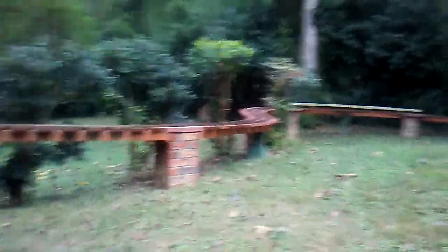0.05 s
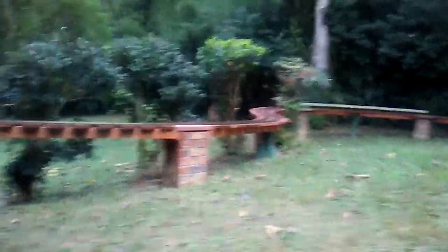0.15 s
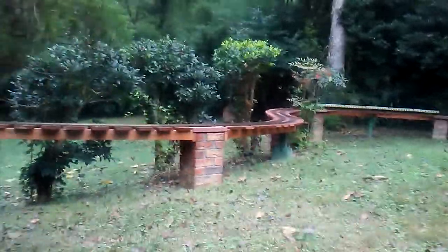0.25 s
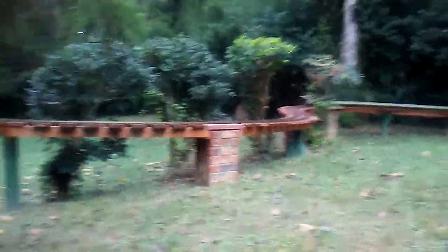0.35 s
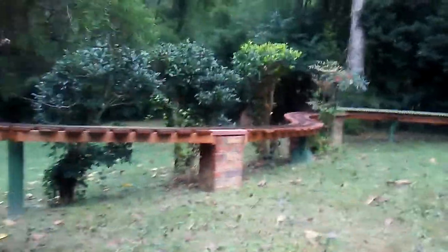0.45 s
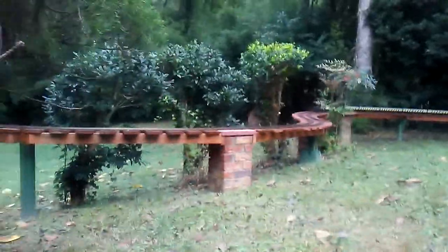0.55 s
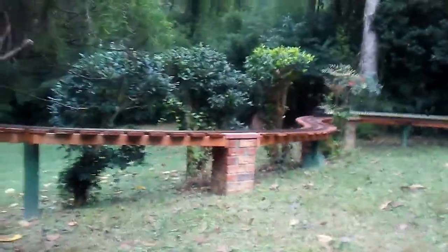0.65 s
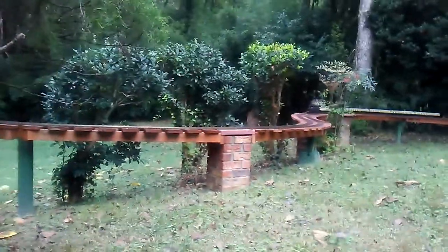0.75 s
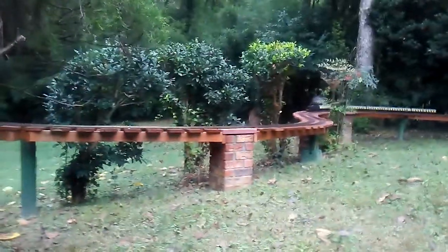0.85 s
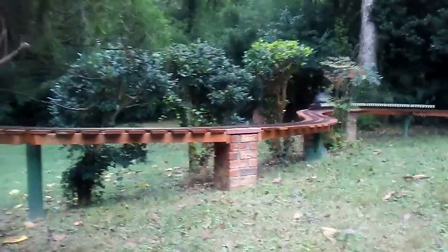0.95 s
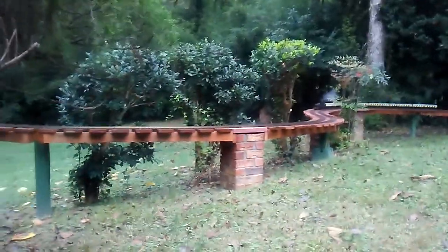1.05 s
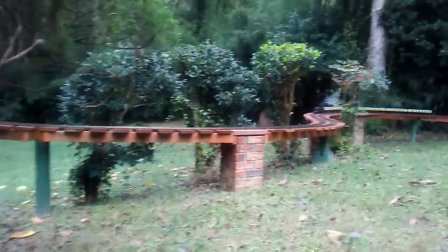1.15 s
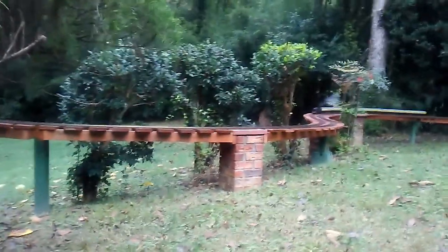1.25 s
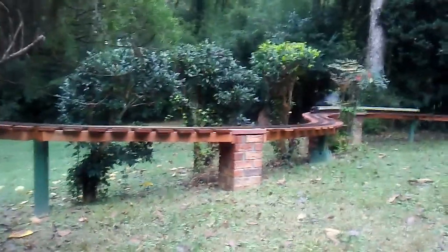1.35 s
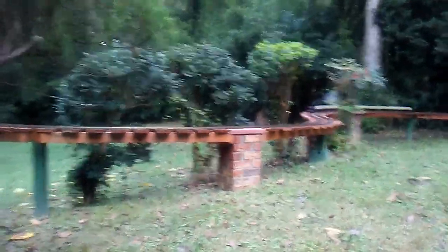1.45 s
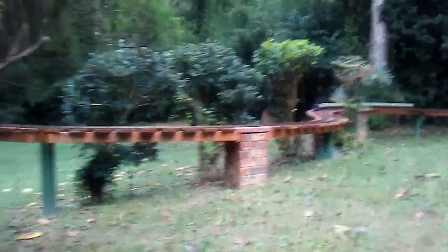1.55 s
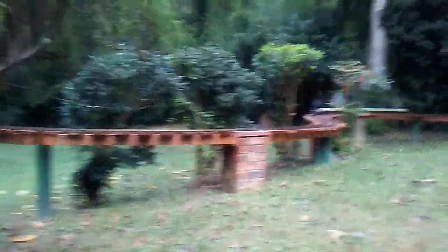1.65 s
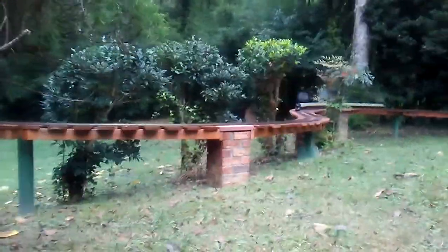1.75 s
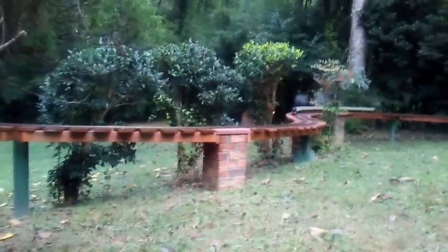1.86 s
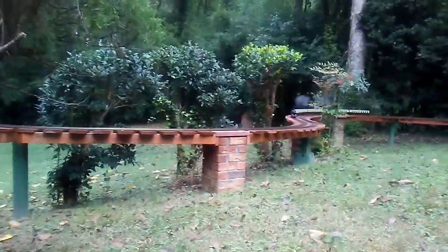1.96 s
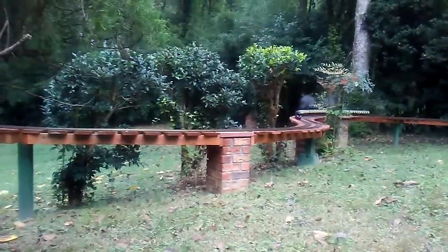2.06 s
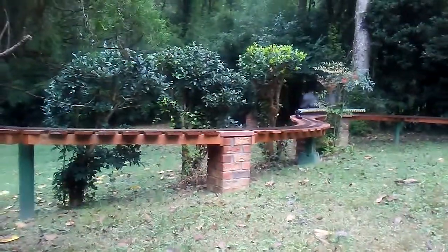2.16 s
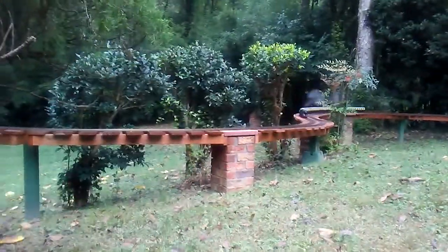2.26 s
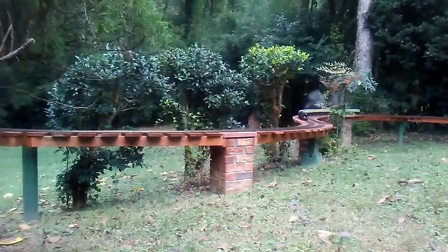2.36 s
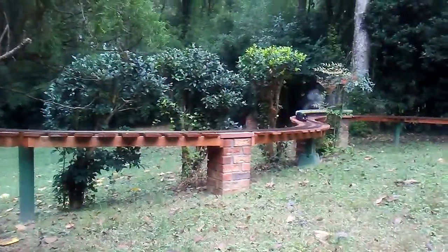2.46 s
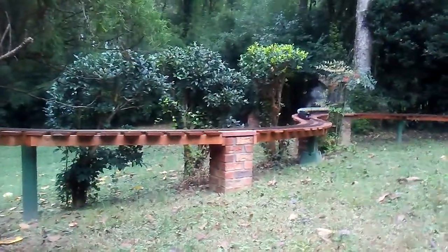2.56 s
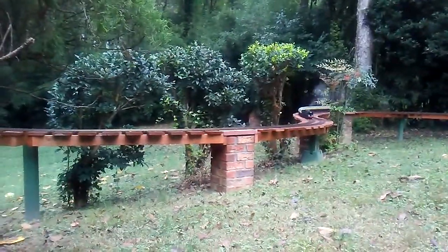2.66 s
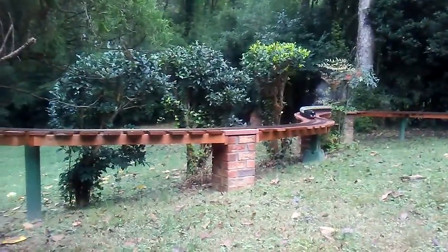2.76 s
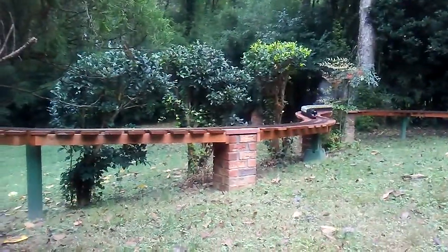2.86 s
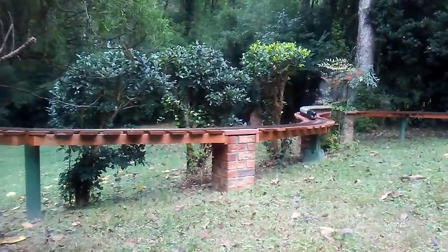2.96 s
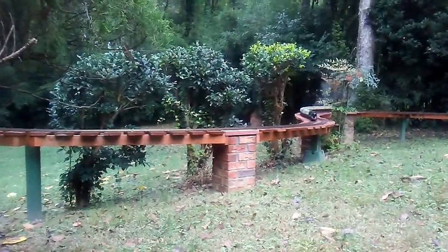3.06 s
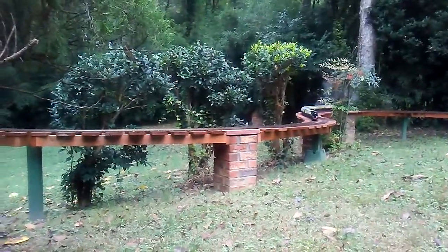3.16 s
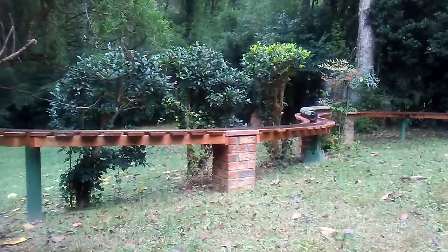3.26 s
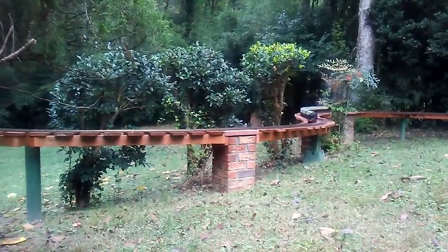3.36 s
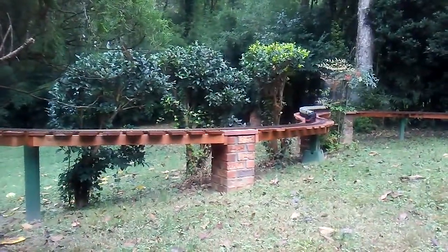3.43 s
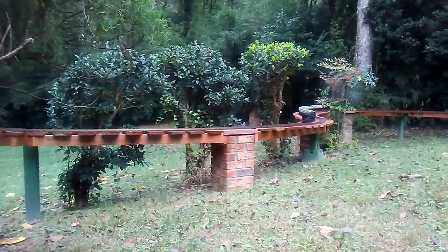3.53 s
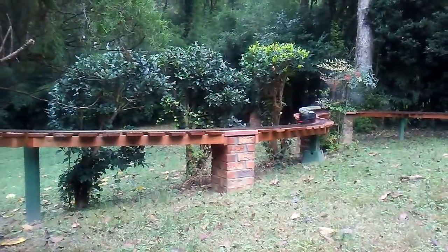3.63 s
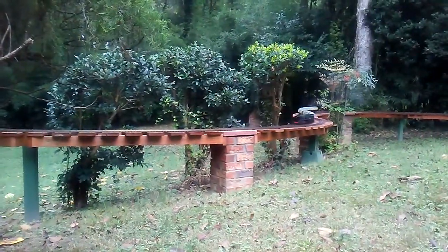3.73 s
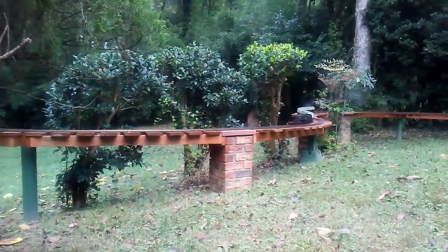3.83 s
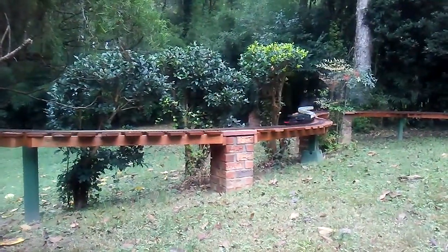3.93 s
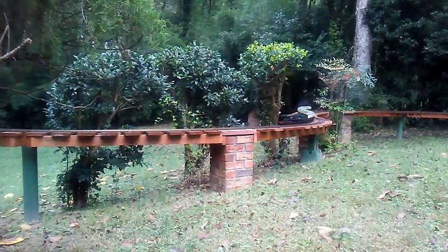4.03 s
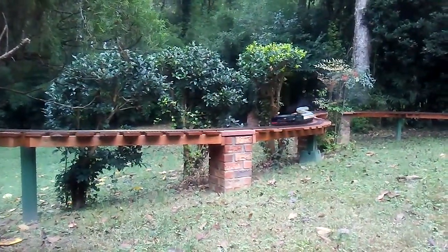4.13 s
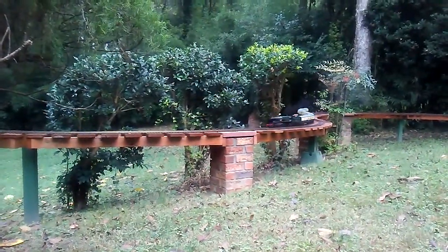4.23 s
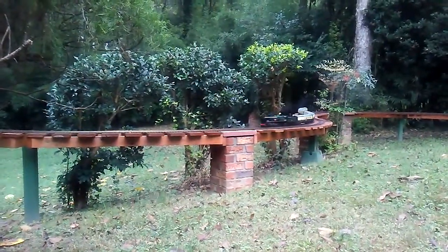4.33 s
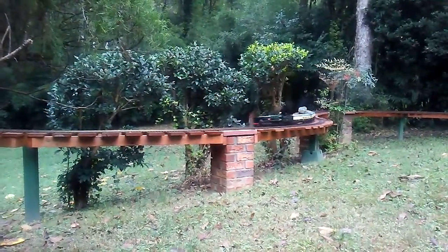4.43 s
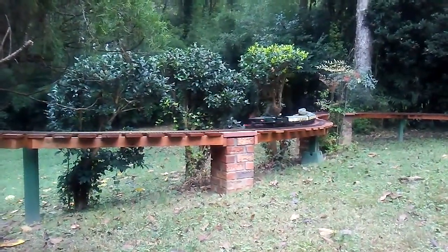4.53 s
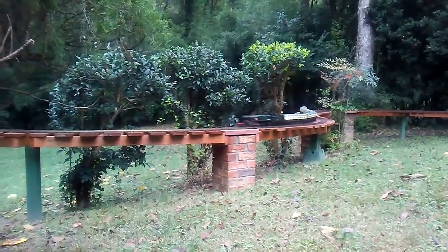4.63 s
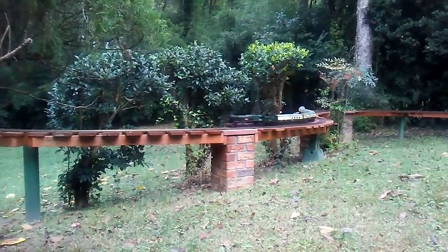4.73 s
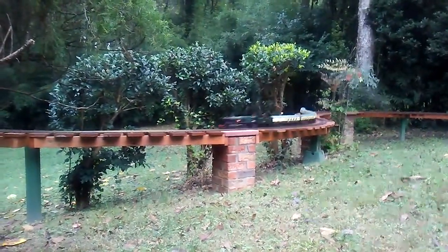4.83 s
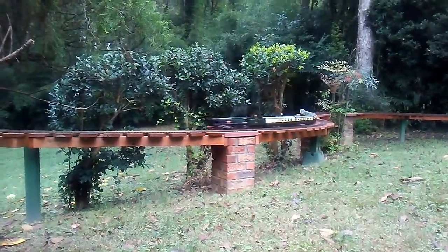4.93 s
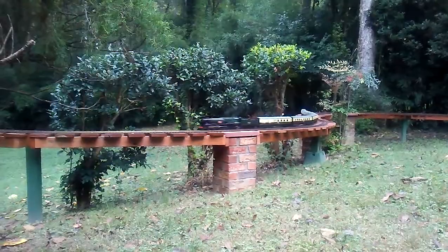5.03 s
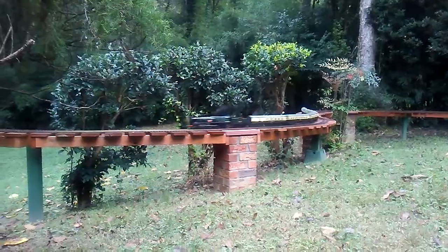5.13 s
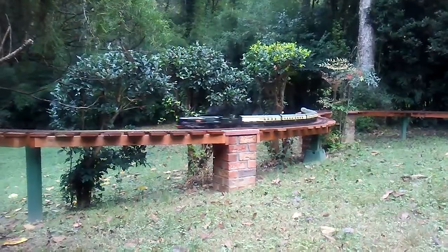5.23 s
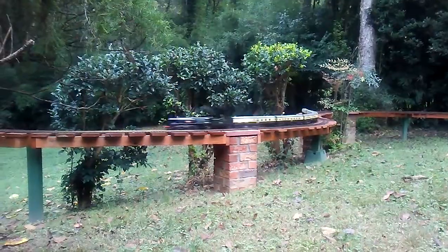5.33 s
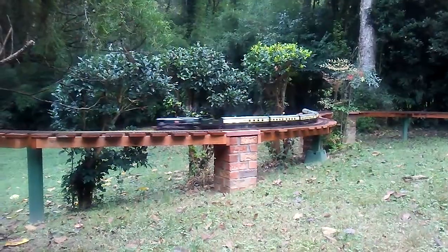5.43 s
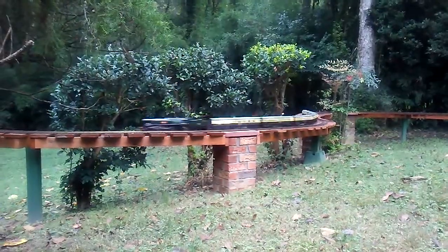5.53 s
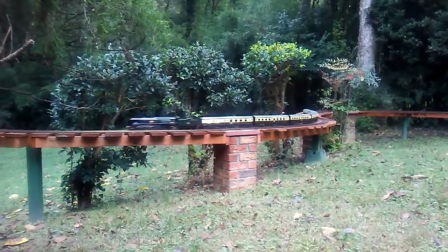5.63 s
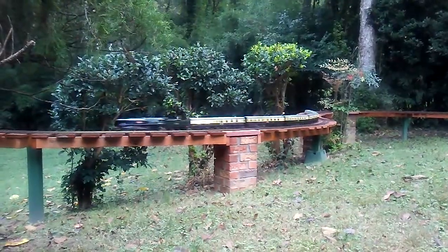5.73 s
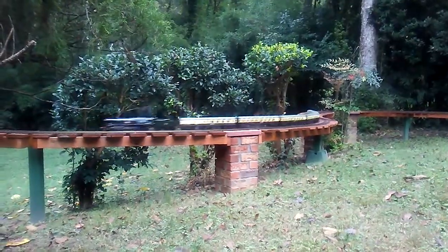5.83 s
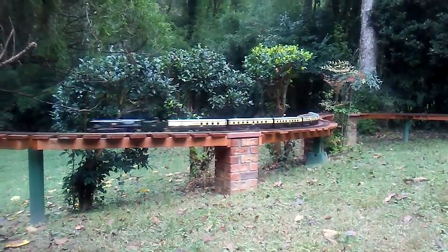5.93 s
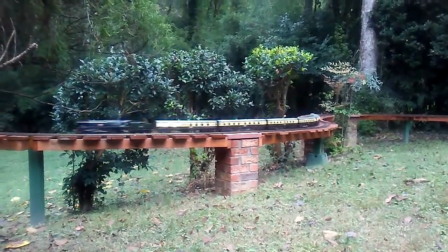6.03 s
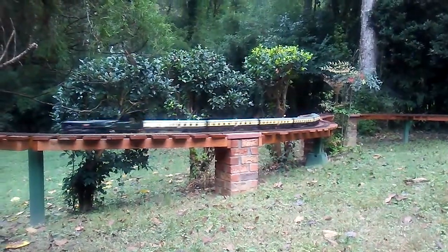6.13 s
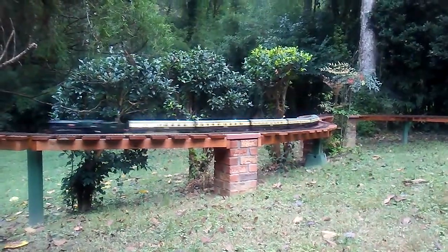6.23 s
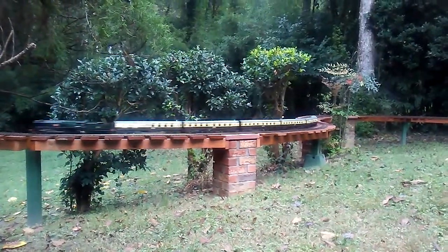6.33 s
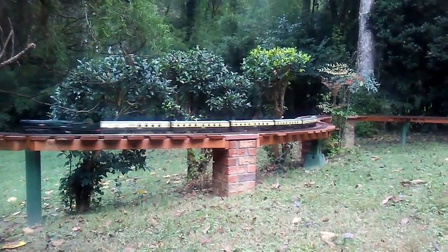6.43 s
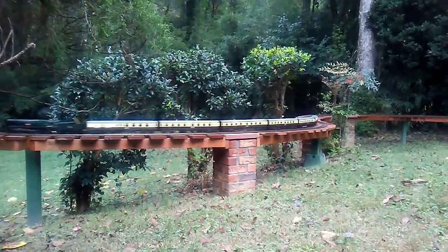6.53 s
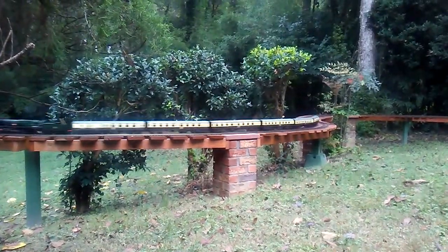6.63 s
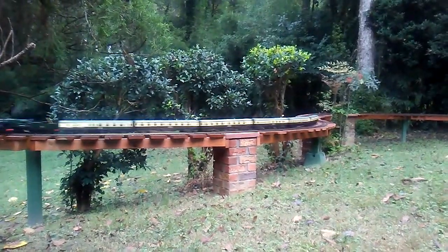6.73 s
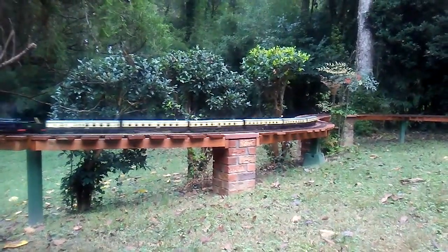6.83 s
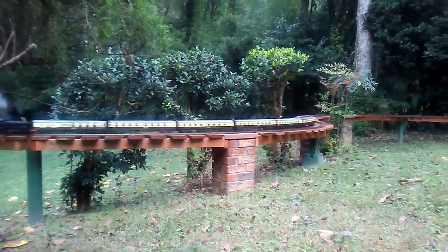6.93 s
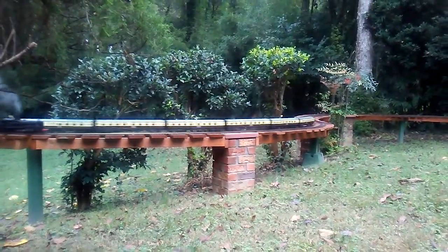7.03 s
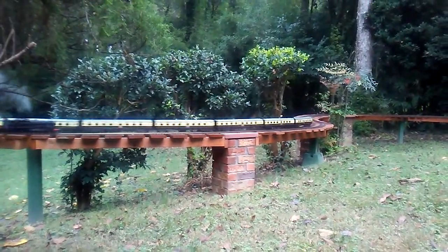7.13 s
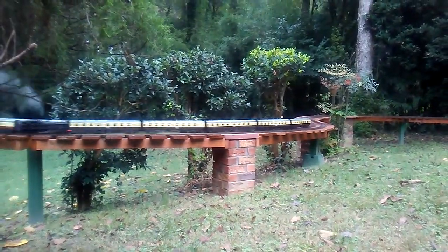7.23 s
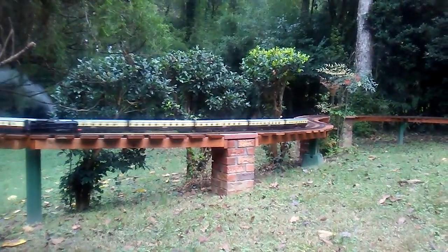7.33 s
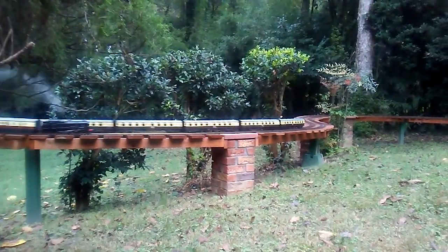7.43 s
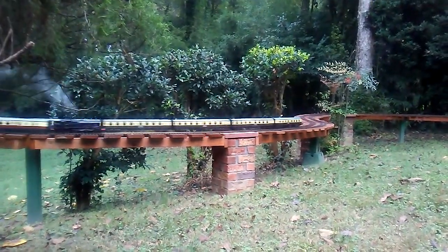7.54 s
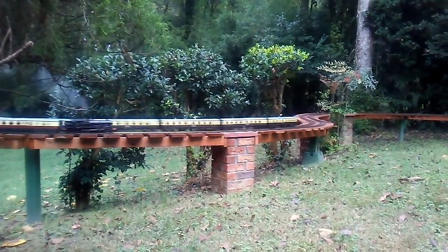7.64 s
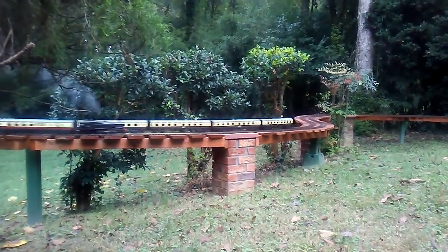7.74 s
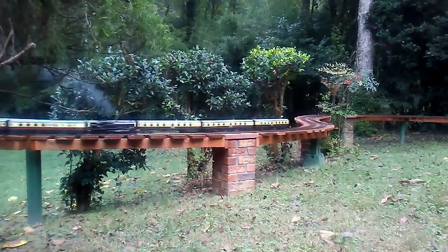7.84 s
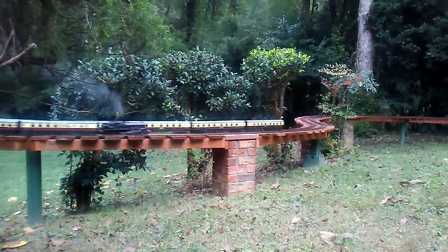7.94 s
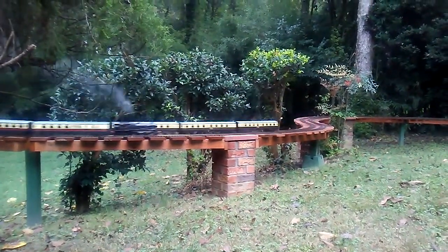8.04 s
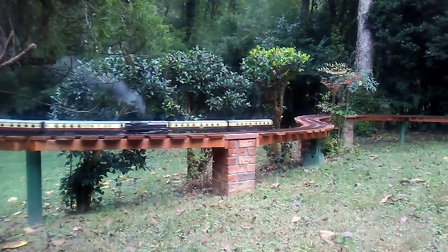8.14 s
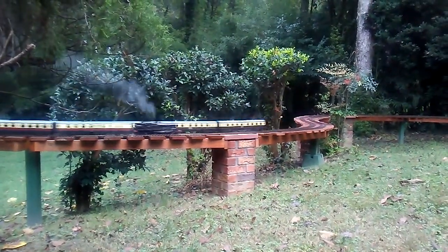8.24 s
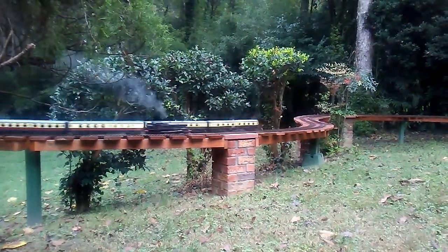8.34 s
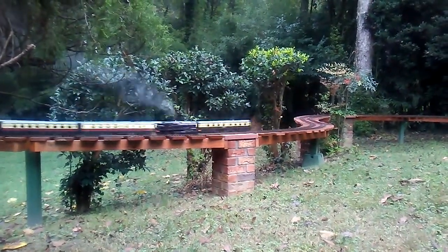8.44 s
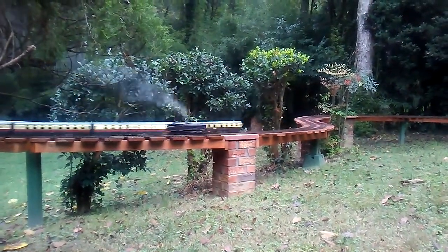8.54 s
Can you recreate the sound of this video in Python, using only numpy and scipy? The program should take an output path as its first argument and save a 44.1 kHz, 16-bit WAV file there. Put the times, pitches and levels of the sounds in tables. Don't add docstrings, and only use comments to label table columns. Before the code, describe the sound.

A small live-steam model train hisses and ticks closer along a raised garden track, wheels clacking over rail joints, steam swelling to a fast chuffing rush.

```python
import sys
import numpy as np
from scipy import signal
from scipy.fft import rfft, irfft, next_fast_len
from scipy.io import wavfile
from scipy.ndimage import uniform_filter1d

SR = 44100
rng = np.random.default_rng(int(sys.argv[2]) if len(sys.argv) > 2 else 0)


def unload_wav(signal):
    wavfile.write(
        sys.argv[1],
        SR,
        np.round(np.clip(np.atleast_2d(signal).T, -1, 1) * 32767).astype(np.int16),
    )


def volts_from_db(level):
    exponent = np.asarray(level, float) / 20
    return 10 ** exponent


N = 378378

# (time [s], nearness [0 hidden .. 1 near and in sight])
NEARNESS = [(0, 0.064), (1.2, 0.037), (2.8, 0.13), (3.55, 0.45), (3.75, 0.4), (5.3, 0.6), (5.7, 0.92),
            (8.58, 1)]

# (frequency [Hz], density [dB per Hz])
GARDEN_SPECTRUM = [(25, -10), (80, -9), (200, 1), (400, 0), (800, -9), (2500, -1), (6000, -42),
                   (16000, -60)]
GARDEN_DB = -52.5
# (time [s], frequency [Hz], level [dB])
FAR_ENGINES = [
    [(0, 64, -70.5), (.9, 65, -74), (1.8, 55, -78), (3, 53, -79), (4.5, 53, -78), (6.3, 52, -80)],
    [(1.7, 78, -81), (2.6, 77, -78), (4, 75, -81)],
    [(3.25, 186, -76), (3.5, 181, -68), (3.7, 179, -77), (4.6, 165, -75), (4.8, 162, -80)],
    [(6.75, 77, -76), (7.1, 82, -63), (7.4, 90, -65), (7.6, 94, -69), (8, 104, -67), (8.58, 116, -62)],
]
# (time [s], length [s], start [Hz], end [Hz], level [dB])
CALLS = [(.31, .04, 2780, 2650, -56), (.553, .03, 2760, 2720, -53), (.58, .03, 2680, 2420, -50),
         (.62, .032, 2390, 2360, -52), (1.8, .1, 2050, 2080, -55), (1.99, .1, 1980, 2170, -54),
         (2.16, .1, 1950, 2180, -54), (2.42, .08, 1980, 2100, -56), (2.87, .06, 2000, 2050, -53),
         (4.795, .022, 6300, 7900, -50), (7.12, .04, 5650, 5550, -43), (7.12, .035, 11300, 11100, -58)]

# (time [s], distance [m])
COACH_DISTANCE = [(0, 11.3), (.21, 13.6), (2.39, 12.6), (3.01, 10.1), (4.18, 9), (5.54, 6.9), (7.05, 6.07),
                  (8.58, 5.7)]
# (time [s], peak level [dB], ring frequency [Hz])
JOINT_CLACKS = [(3.4699, -35, 1790), (3.5026, -28, 1580), (3.5496, -24, 1600), (3.592, -30, 1490),
                (3.7777, -28, 1770), (3.87, -27, 1700), (3.9349, -31, 1600), (3.9636, -31, 1680),
                (3.98, -31, 1710), (4.0737, -28, 1750), (4.1254, -31, 1760), (4.4338, -34, 1700),
                (4.5007, -25, 1680), (4.599, -30, 1590), (4.9995, -34, 1700), (5.0393, -31, 1800),
                (5.1392, -32, 1750), (5.164, -31, 1830), (5.494, -31, 1700), (5.5153, -27.5, 1690),
                (5.6693, -27.5, 1750), (6.06, -33, 1600), (6.1284, -29.5, 1720), (6.2277, -31.5, 1700),
                (6.6472, -36, 1910), (6.6742, -25.5, 1750), (7.1047, -32, 1580), (7.235, -30, 1700),
                (8.1616, -40, 1940), (8.3284, -38, 1690)]
# (frequency [Hz], density [dB per Hz])
DECK_FAR_SPECTRUM = [(150, -19.5), (400, -10), (620, -0.5), (800, -4.5), (970, -2), (1200, -5),
                     (1500, -5.5), (2500, -40), (9000, -84)]
DECK_NEAR_SPECTRUM = [(150, -17), (400, -13.5), (600, -6.5), (780, -5), (970, 1), (1150, -4), (1400, -7.5),
                      (2500, -19.5), (9000, -75)]
RAIL_SPECTRUM = [(300, -55), (1100, -30), (1450, -0.5), (1700, 4), (2050, 2), (2350, -7.5), (2800, -42),
                 (9000, -83)]
DECK_DB_AT_1M, RAIL_DB_AT_1M = -27, -35.5
RAIL_SHARE = 0.72
RAIL_HUM_DB, RAIL_HUM_S = -28, 0.15

# (time [s], level [dB])
LEAK_LEVEL = [(0, -54.5), (.2, -60.5), (.45, -57.5), (1.0, -55), (1.05, -58), (1.3, -62.5), (1.65, -55.5),
              (1.91, -57.5), (2.4, -63.5), (2.9, -62.5), (3.06, -59), (3.55, -59), (3.6, -57),
              (3.92, -53.5), (4.87, -50.5), (5.37, -50.5), (5.97, -45.5), (8.58, -47)]
# (frequency [Hz], density [dB per Hz])
BLOWER_SPECTRUM = [(500, -67), (2000, -15), (2600, -5.5), (3150, 4.5), (3500, 6), (4200, 1.5), (5500, -29),
                   (7000, -48), (11000, -82)]
# (frequency [Hz], density [dB per Hz])
LEAK_FAR_SPECTRUM = [(3500, -6.5), (5600, -8), (6800, 1), (8300, 1), (9400, -1), (10200, -10.5),
                     (11500, -14.5), (16000, -51)]
LEAK_NEAR_SPECTRUM = [(3500, -18.5), (5600, -6), (6800, 5), (7600, -3), (8300, 3.5), (9300, -1.5),
                      (10500, -1), (11400, -17), (16000, -34)]
FIZZ_FAR_SPECTRUM = [(8000, -40), (10500, -2), (12000, -5), (13500, -4), (14500, -4), (16000, -5)]
FIZZ_NEAR_SPECTRUM = [(8000, -40), (11300, -9), (12300, -5), (13200, -8), (14200, -5), (15000, -3),
                      (15700, 0)]
BLOWER_FAR_DB, BLOWER_NEAR_DB = -49.5, -45.5
FIZZ_FAR_DB, FIZZ_NEAR_DB = -9.5, -7
# (time [s], half width [s], leak change [dB])
POSTS = [
    (.19, .04, -2),
    (.33, 0.061, -9),
    (1.31, .05, -4),
    (2.41, .04, 0),
    (2.65, 0.17, -2.5),
    (3.01, .05, -4),
    (4.93, 0.079, -3),
    (5.81, .07, -2.5),
    (8.19, 0.045, 3),
    (8.3, 0.087, -0.5),
]
# (time [s], half width [s], fizz change [dB])
BENDS = [
    (.9, .6, 0),
    (1.9, .4, -6),
    (2.5, .45, -1),
    (3.3, .4, -3),
    (4, .5, 1),
    (7.8, .7, 2),
]

# (time [s], position [turns]); the strongest beat falls on whole turns
WHEEL_TURNS = [(-.048, -1), (.886, 4), (1.071, 5), (2.16, 11), (3.42, 18), (3.785, 20), (4.714, 25),
               (5.467, 29), (5.841, 31), (6.205, 33), (6.744, 36), (7.098, 38), (7.452, 40), (8.158, 44),
               (8.68, 47)]
# (place [turns], far tick [dB], near tick [dB], puff [dB])
VALVES = [
    (0, 0, 0, 1.5),
    (.254, -10, -7, -3),
    (.507, -4, -5, 1.5),
    (.742, -10, -4, -1.5),
]
# (time [s], peak level [dB])
EFFORT = [(0, -34), (.5, -46), (.9, -37), (1.6, -37), (2.2, -34), (3.42, -33.5), (3.6, -39), (4.2, -38),
          (4.9, -49), (5.1, -48), (5.28, -35), (6.2, -31), (6.74, -26), (7.27, -22.5), (7.45, -28),
          (8.58, -27)]
# (time [s], tick peak [dB], puff [dB])
ODD_BEATS = [(.044, -41, -58), (1.253, -29.5, -72), (1.615, -34.5, -65), (2.431, -37.5, -65),
             (2.653, -34.5, -72), (4.484, -38, -62), (5.324, -37, -49), (5.7, -52, -51), (5.934, -50, -45),
             (5.977, -54, -51), (6.07, -36, -49), (6.115, -33, -46), (6.339, -44, -57), (6.431, -45, -59),
             (6.61, -43, -40), (6.698, -45, -48), (6.874, -29, -41), (6.964, -26.5, -42), (7.051, -32, -46),
             (7.098, -23.5, -38), (7.142, -36, -42), (7.186, -31, -38.5), (7.319, -27.5, -45),
             (7.628, -25, -47), (7.673, -32, -43), (7.852, -42, -49), (7.982, -32, -55),
             (8.025, -29.5, -41), (8.202, -42, -51), (8.55, -28, -44)]
TICK_SCATTER_DB, PUFF_SCATTER_DB = 2.5, 2.5
PUFF_FAR_DB, PUFF_NEAR_DB = -7, 1

# (frequency [Hz], gain [dB])
MICROPHONE = [(30, -35), (50, -0.5), (100, -1.5), (120, -22), (140, -7), (170, 0.5), (4050, -1),
              (4300, -18), (4480, -49), (4800, -23), (5300, -11), (5600, -2.5)]
# (frequency [Hz], chance when quiet [0..1], chance when busy [0..1])
DROPOUTS = [(4300, 0, 0), (4400, .1, .5), (4550, .22, .97), (4750, .04, .9), (4950, 0, .6), (5100, 0, .2),
            (5250, 0, 0)]
HISS_DB, EDGE_HZ = -67, 15740


def evened(x):
    return x / np.sqrt(np.mean(x ** 2) + 1e-20)


def read(points, hz):
    f, value = np.transpose(points)
    return np.interp(np.log(hz + 1), np.log(f + 1), value)


def follow(rows, column):
    rows = np.asarray(rows)
    return np.interp(np.arange(N) / SR, rows[:, 0], rows[:, column])


def blend(far, near, share):
    return far + (near - far) * share


def bumps(rows):
    t = np.arange(N) / SR
    return sum(db * np.maximum(1 - abs(t - s) / half_s, 0) for s, half_s, db in rows)


def add(mix, s, sound):
    part = mix[max(round(s * SR), 0):][:len(sound)]
    part += sound[:len(part)]


def tone(hz):
    return np.sin(2 * np.pi * np.cumsum(hz) / SR)


def band(x, lo_hz, hi_hz):
    return signal.sosfilt(signal.butter(2, [lo_hz, hi_hz], "bandpass", fs=SR, output="sos"), x)


def narrow_noise(lo_hz, hi_hz):
    return evened(band(band(rng.standard_normal(N), lo_hz, hi_hz), lo_hz, hi_hz))


def burst(hz, rise_s, t60_s):
    t = np.arange(900) / SR
    shape = (1 - np.exp(-(t / rise_s) ** 2)) * volts_from_db(-60 * t / t60_s)
    return shape / shape.max() * np.sin(2 * np.pi * hz * t)


def rush(far, near, patchy_db, flicker_db):
    frames, hz = N // 128 + 5, np.fft.rfftfreq(512, 1 / SR)
    real, imaginary = rng.standard_normal((frames, len(hz), 2), dtype=np.float32).T
    patches = rng.standard_normal((frames // 8 + 1, len(hz)), dtype=np.float32)
    patches = np.repeat(patches, 8, axis=0)[:frames].T
    patches = evened(uniform_filter1d(uniform_filter1d(patches, size=6, axis=0), size=16, axis=1))
    flicker = evened(uniform_filter1d(rng.standard_normal(frames), size=4))
    share = np.clip(np.interp(np.arange(frames) * 128 / SR, *np.transpose(NEARNESS)), 0, 1)
    colour = volts_from_db(np.outer(read(far, hz), 1 - share) + np.outer(read(near, hz), share))
    colour = colour / np.linalg.norm(colour, axis=0)
    z = (real + 1j * imaginary) * colour * volts_from_db(patchy_db * patches + flicker_db * flicker)
    return evened(signal.istft(z.astype(np.complex64), nperseg=512, noverlap=384)[1][:N])


def garden():
    out = volts_from_db(GARDEN_DB) * rush(GARDEN_SPECTRUM, GARDEN_SPECTRUM, patchy_db=1.0, flicker_db=-2.0)
    t = np.arange(N) / SR
    for rows in FAR_ENGINES:
        on = (t >= rows[0][0]) & (t <= rows[-1][0])
        waver = 1 + .4 * evened(uniform_filter1d(rng.standard_normal(N), size=3500))
        wander = 1 + .012 * evened(uniform_filter1d(rng.standard_normal(N), size=9000))
        level = volts_from_db(follow(rows, column=2) + 5.5)
        out = out + on * waver * level * tone(follow(rows, column=1) * wander)
    return out


def calls():
    out = np.zeros(N)
    for s, length_s, start_hz, end_hz, db in CALLS:
        hz = np.linspace(start_hz, end_hz, round(length_s * SR))
        throb = 1 + 0.33 * evened(uniform_filter1d(rng.standard_normal(8000), size=300))[:len(hz)]
        add(out, s, volts_from_db(db + 4.0) * throb * signal.windows.tukey(len(hz), .5) * tone(hz))
    return out


def wheels():
    spread_db = -20 * np.log10(follow(COACH_DISTANCE, column=1))
    deck = rush(DECK_FAR_SPECTRUM, DECK_NEAR_SPECTRUM, patchy_db=0.5, flicker_db=-0.16)
    deck = volts_from_db(DECK_DB_AT_1M + 0.79 + spread_db) * deck

    clacks, rattle_power, struck_power = np.zeros((3, N))
    t = np.arange(8000) / SR
    rattle_shape = (1 - np.exp(-t / 0.0075)) ** 2 * volts_from_db(-120 * t / 0.39)
    for s, db, hz in JOINT_CLACKS:
        ring = burst(hz, .0008, .016) + .3 * burst(1.15 * hz, .0008, .03)
        add(clacks, s - .0007, volts_from_db(db - .3) * ring)
        add(rattle_power, s, volts_from_db(2 * (db - 15)) * rattle_shape)
        add(struck_power, s, [volts_from_db(2 * db) * SR / 100])
    rattle = np.sqrt(rattle_power) * narrow_noise(1480, 1860)

    hum_size = round(RAIL_HUM_S * SR)
    hum_power = abs(uniform_filter1d(uniform_filter1d(struck_power, hum_size), hum_size))
    rolling_power = volts_from_db(2 * (RAIL_DB_AT_1M + RAIL_SHARE * spread_db))
    rail_level = np.sqrt(rolling_power + volts_from_db(RAIL_HUM_DB) * hum_power)
    rail = rail_level * rush(RAIL_SPECTRUM, RAIL_SPECTRUM, patchy_db=1.5, flicker_db=0.4)
    return deck + clacks + rattle + rail


def leak_db():
    return follow(LEAK_LEVEL, column=1) + bumps(POSTS)


def steam():
    near = follow(NEARNESS, column=1)
    blower = rush(BLOWER_SPECTRUM, BLOWER_SPECTRUM, patchy_db=0.7, flicker_db=0.8)
    blower = volts_from_db(blend(BLOWER_FAR_DB, BLOWER_NEAR_DB, near ** 2)) * blower
    leak = rush(LEAK_FAR_SPECTRUM, LEAK_NEAR_SPECTRUM, patchy_db=0.83, flicker_db=0.85)
    fizz = rush(FIZZ_FAR_SPECTRUM, FIZZ_NEAR_SPECTRUM, patchy_db=.7, flicker_db=1.1)
    fizz = volts_from_db(blend(FIZZ_FAR_DB, FIZZ_NEAR_DB, near) + bumps(BENDS)) * fizz
    half_shadow = volts_from_db(-.5 * bumps(POSTS))
    return blower + volts_from_db(leak_db() + 3.0) * (leak + half_shadow * fizz)


def beats():
    place, far_db, near_db, valve_puff_db = np.tile(np.transpose(VALVES), 49)
    turns = np.arange(len(place)) // len(VALVES) - 1 + place
    s = np.interp(turns, *np.transpose(WHEEL_TURNS)[::-1])
    at = np.clip((s * SR).astype(int), 0, N - 1)
    near = follow(NEARNESS, column=1)[at] ** 2
    tick_luck, puff_luck = rng.uniform(-1.1, 1, (len(s), 2)).T
    tick = follow(EFFORT, column=1)[at] + blend(far_db, near_db, near)
    tick = tick + TICK_SCATTER_DB * tick_luck * (place > 0)
    puff = leak_db()[at] + blend(PUFF_FAR_DB, PUFF_NEAR_DB, near) + valve_puff_db
    puff = puff + PUFF_SCATTER_DB * puff_luck
    rows = np.transpose([s, tick, puff])
    for odd in ODD_BEATS:
        rows[np.argmin(abs(s - odd[0]))] = odd
    return rows[(s >= 0) & (s < N / SR)]


def exhaust():
    ticks, spit_gate, puff_gate = np.zeros((3, N))
    rows = beats()
    chance = rng.uniform(-1, 1, (len(rows), 5))
    puff = np.sin(np.pi * np.linspace(0, 1, round(0.031 * SR)) ** 0.67) ** 2
    spit = abs(signal.hilbert(burst(4000, .0005, .012)))
    for (s, tick_db, puff_db), (pitch, spray, edge, first, second) in zip(rows, chance):
        ring = burst(3200 * (1 + .05 * pitch), .0014, .008)
        ring = ring + (.28 + .28 * edge) * burst(3750, .0012, .006)
        add(ticks, s - .0018, volts_from_db(tick_db + .8) * ring)
        add(ticks, s + 0.000993 + 0.00055 * first, volts_from_db(tick_db - 13) * ring)
        add(ticks, s + 0.0025 + 0.00086 * second, volts_from_db(tick_db - 14) * ring)
        add(spit_gate, s - .002, volts_from_db(.5 * tick_db - 31.5 + 7 * spray) * spit)
        add(puff_gate, s - .0245, volts_from_db(puff_db - 1.3) * puff)
    spray_noise = evened(band(rng.standard_normal(N), 12000, 19500))
    spits = spit_gate * follow(NEARNESS, column=1) ** 3 * spray_noise
    return ticks + spits + puff_gate * narrow_noise(5540, 6500)


def scene():
    return np.tile(garden() + calls() + wheels() + steam() + exhaust(), (2, 1))


def starved(x):
    hz, t, z = signal.stft(x, SR, window="cosine", nperseg=2048, noverlap=1024)
    band_hz = (np.arange(len(hz)) // 8 * 8 + 4) * hz[1]
    f, quiet, busy = np.transpose(DROPOUTS)
    near = np.interp(t, *np.transpose(NEARNESS))
    chance = blend(np.interp(band_hz, f, quiet)[:, None], np.interp(band_hz, f, busy)[:, None], near)
    luck = rng.standard_normal((len(t), len(hz) // 8 + 1))
    luck = evened(uniform_filter1d(luck, size=3, axis=0))
    luck = 1 / (1 + np.exp(-1.7 * luck))
    luck = np.repeat(luck, 8, axis=1)[:, :len(hz)].T
    return signal.istft(z * (luck > chance), SR, window="cosine", nperseg=2048, noverlap=1024)[1][..., :N]


def top_cut(x):
    return signal.sosfilt(signal.butter(12, 16960, fs=SR, output="sos"), x)


def record(dry):
    size = next_fast_len(N + 8192)
    hz = np.fft.rfftfreq(size, 1 / SR)
    hiss = volts_from_db(HISS_DB) * rfft(rng.standard_normal(N), size) * (hz > 200) / (1 + (hz / 6500) ** 4)
    heard = rfft(dry[0], size) * volts_from_db(read(MICROPHONE, hz))
    wet = irfft((heard + hiss) * (hz < EDGE_HZ), size)[:N]
    return top_cut(np.tile(starved(wet), (2, 1)))


dry = scene()
out = record(dry)
unload_wav(out)
```